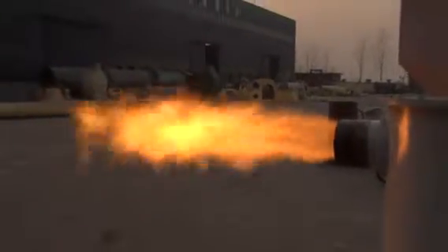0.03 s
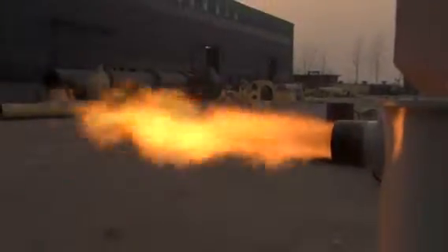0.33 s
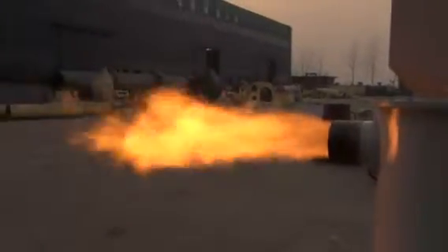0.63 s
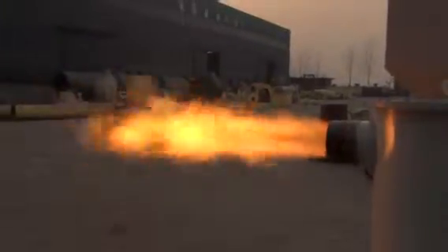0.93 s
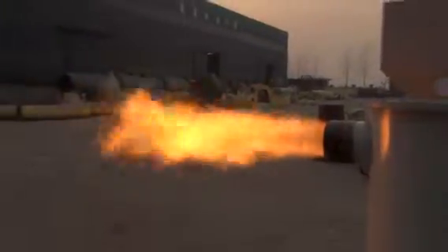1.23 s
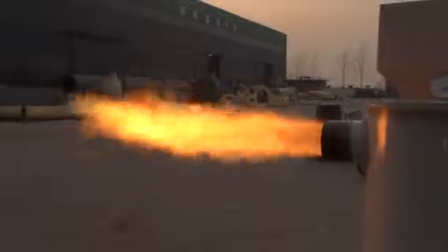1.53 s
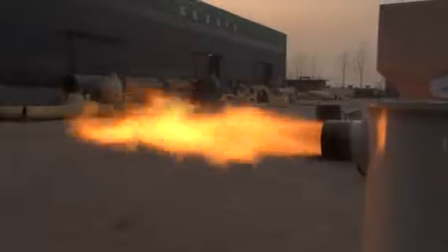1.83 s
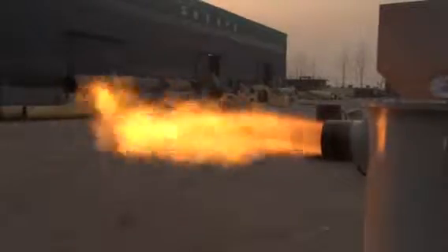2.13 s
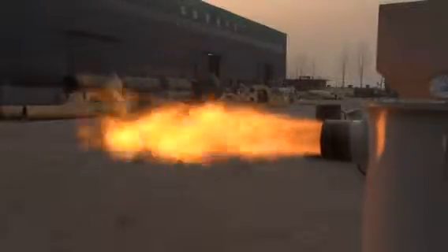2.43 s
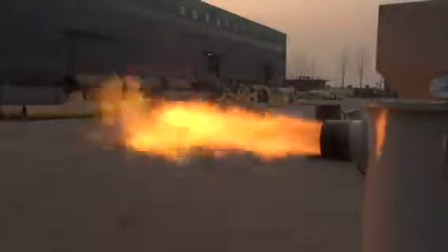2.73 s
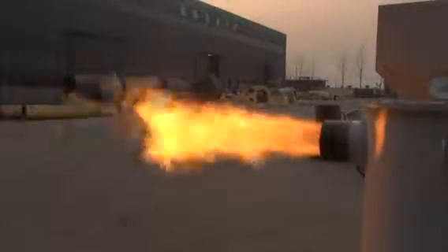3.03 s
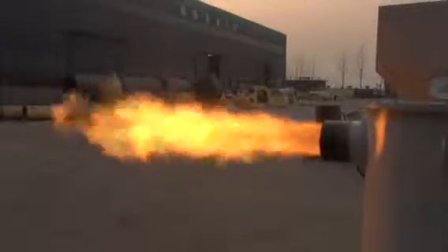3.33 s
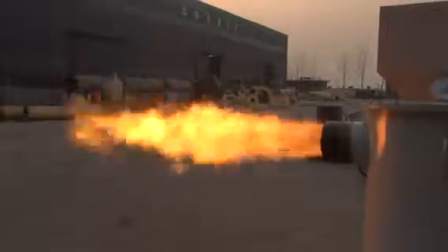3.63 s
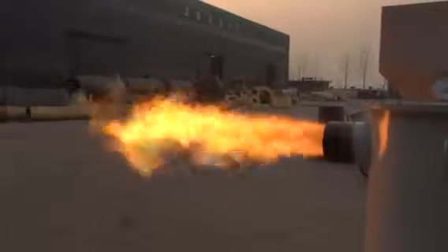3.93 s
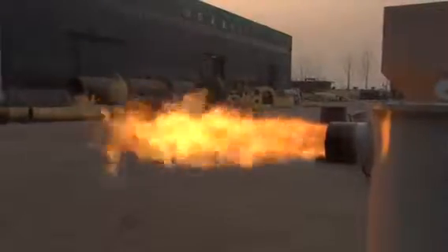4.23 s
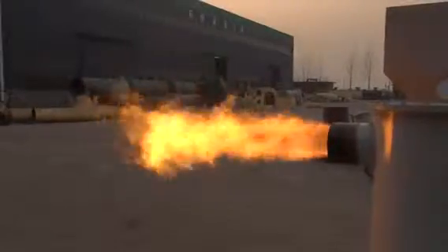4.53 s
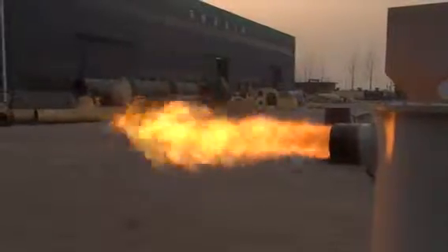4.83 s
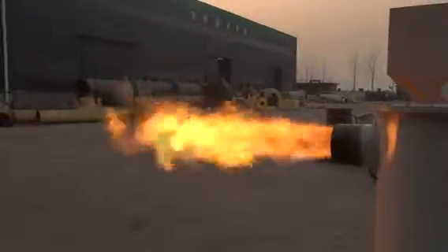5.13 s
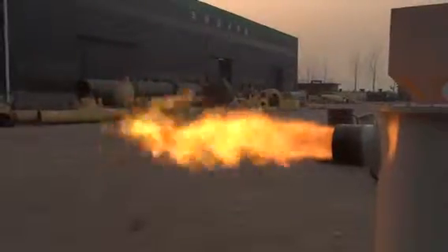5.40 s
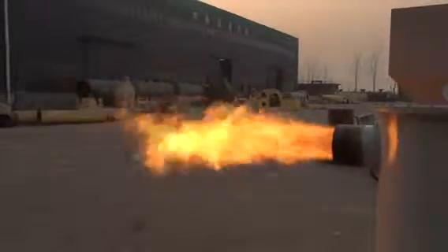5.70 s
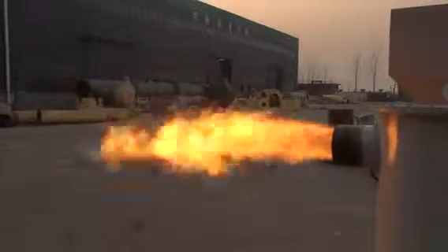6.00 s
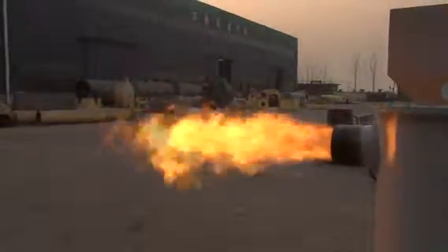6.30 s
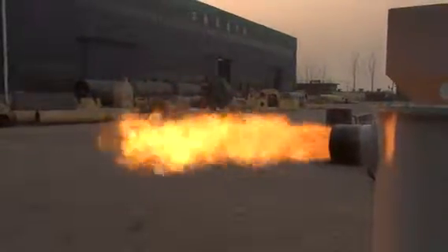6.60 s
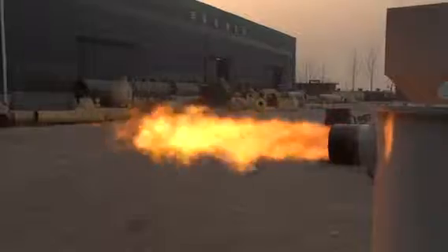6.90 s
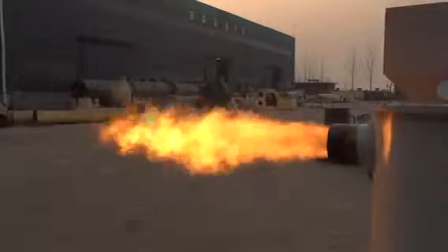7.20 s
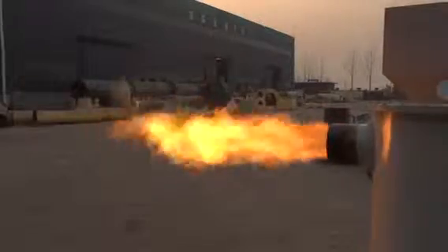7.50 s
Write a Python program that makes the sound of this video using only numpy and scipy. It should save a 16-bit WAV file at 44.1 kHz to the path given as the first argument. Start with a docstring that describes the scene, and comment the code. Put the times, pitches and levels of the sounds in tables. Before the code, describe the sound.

Steady low roar of a flame jet blasting from a burner tube in an open yard, with fluttering hiss and a very faint blower whine.

```python
"""Industrial burner in an open yard

A long horizontal flame burns a few metres away. Turbulent combustion excites the resonances of the
burner tube and its housing, which roar with a low rumble, a throbbing drone and a hollow howl.
The jet hisses in gusts above them, the blower adds a faint whine and a fast limiter shaves the peaks."""
import sys
import numpy as np
from scipy import signal
from scipy.fft import rfft, irfft
from scipy.io import wavfile
from scipy.ndimage import uniform_filter1d

SR = 44100
rng = np.random.default_rng(int(sys.argv[2]) if len(sys.argv) > 2 else 0)


def output_pcm(signal):
    """Save a mono or channel-first signal as 16-bit PCM at the path in sys.argv[1].

    Samples are clipped to [-1, 1] before scaling.
    """
    pcm = np.clip(np.atleast_2d(signal).T, -1, 1) * 32767
    wavfile.write(sys.argv[1], SR, np.round(pcm).astype(np.int16))


N = 341775
TIME = np.arange(N) / SR
FRAME, HOP = 512, 128  # samples

# Spectrum of the jet's hiss: frequency_hz, relative_level_db
JET_SPECTRUM = [(500, -34), (920, -4), (1250, 0), (1430, -1), (1600, -0.5), (2170, 0.25), (2280, -4.5),
                (2750, -6), (3300, -10), (4400, -15), (7500, -20.5), (9800, -24.1), (11900, -31.5),
                (13000, -41)]
# Coherence of the hiss between left and right: frequency_hz, coherence (0 to 1)
JET_COHERENCE = [(100, 1.0), (3500, 0.99), (5000, 0.94), (8000, 0.78), (12000, 0.67)]
# Gusts of the jet's lower rasp and high hiss: time_s, rasp_gain_db, hiss_gain_db
JET_GUSTS = [(0.0, 0, 0.0), (0.28, 0.1, -0.2), (0.33, -2.0, -3), (0.45, 0.2, 0), (0.7, -1.1, -1.0),
             (0.8, -0.5, 0.5), (0.97, -0.8, -0.5), (1.12, 0.7, 0.5), (1.57, -1.1, -1.0), (1.98, 2.6, 2),
             (2.12, -1.1, -1), (2.25, 0.9, 2.2), (2.35, -0.8, 0), (2.42, 1.6, 1.4), (2.8, -0.4, 0.2),
             (2.88, 1.3, 2.2), (3.02, -0.2, 0.3), (3.12, 0.4, 1.1), (3.2, 1, 0), (3.27, -1, 0.5),
             (3.35, 2.5, 1.3), (3.42, -1.1, -0.5), (3.48, 1.6, 2.5), (3.6, -0.6, 0), (4.03, 0.5, 0.5),
             (4.08, 0.7, 1), (4.28, 0.5, -0.8), (4.38, 0.2, -0.6), (4.42, -2.2, -1.6), (4.6, 0.5, 0.3),
             (4.95, 0.0, -0.8), (5.22, 0.3, 0), (5.55, -0.5, -0.8), (5.62, 1.5, 1), (5.83, -1.7, -0.8),
             (6.08, -0.3, -0.4), (6.15, -1.7, -1.7), (6.45, 0.8, 0.5), (6.88, -1.5, -0.2), (7.22, 0.6, 0.2),
             (7.33, -1.8, -1), (7.45, 0, -1.3), (7.53, -1.8, -1.8), (7.75, -1, 0.3)]
# Narrow resonances of the nozzle: centre_hz, width_hz, boost_db
NOZZLE_MODES = [(1590, 62, 1), (2180, 36, 2.5), (3660, 80, 1.5)]
# Resonances of the burner tube and housing: centre_hz, width_hz, relative_level_db
BURNER_MODES = [(77, 32.3, -8.5), (125.3, 21.5, -11.5), (154.5, 10, -9), (187.3, 30, -1.5), (213, 28, -9),
                (241, 24, -1.5), (256.7, 23, -0.5), (276, 19, -8), (296, 17, -7), (314.5, 39.5, -4),
                (355.4, 27, -8), (444, 40.5, -8.5), (485, 47, -7.5), (533.4, 53.5, -2.05), (579, 49, -5),
                (653, 87, -11.5), (729, 56, -10.5), (782, 58, -10.5), (845.5, 67, -14), (1054, 100, -19)]
# Continuous spectrum between those resonances: frequency_hz, relative_level_db
ROAR_CONTINUUM = [(10, -42), (22, -40), (50, -21), (130, -18), (390, -18.5), (850, -26), (1000, -33),
                  (2000, -72)]
# Rumble of the billowing flame: time_s, gain_db
RUMBLE_SWELL = [(0.0, -3.5), (0.12, 0.5), (0.9, 1), (0.97, -4), (1.5, 1.5), (1.6, -5.5), (1.73, 3.5),
                (2.12, -3.5), (2.33, 0.2), (2.62, 3.7), (2.7, -2.9), (3.35, 2), (3.45, -3.5), (3.62, 1.9),
                (3.75, -5), (3.88, 1.5), (4.8, -3), (4.92, 2.5), (5.15, -5.5), (5.28, 1), (6.55, -0.3),
                (6.65, -3.1), (7.03, -1.5), (7.1, -3), (7.75, 2.5)]
# Throb of the deep drone: time_s, gain_db
DRONE_THROB = [(0.0, -1.3), (0.07, 2.6), (0.55, -4), (0.62, 2), (0.82, -1.5), (1.0, 2.6), (1.35, -3),
               (1.43, 0.8), (1.5, -2.7), (1.9, 2.3), (2.08, -3.3), (2.15, 0), (2.77, 1.6), (2.85, -2.9),
               (2.98, 1.2), (3.17, 1), (3.25, -8), (3.35, 1), (3.95, -2), (4.03, 0.5), (4.17, -3),
               (4.28, 4), (4.33, -0.8), (4.8, 1.0), (4.85, -3.5), (5.0, 0.7), (5.08, -5.6), (5.15, 1),
               (5.38, -3.4), (5.58, 2.5), (5.65, -4), (5.7, -0.3), (5.95, -2.5), (6.17, 3.6), (6.28, -5),
               (6.38, 3.5), (6.45, -4), (6.5, 0.0), (7.17, -0.7), (7.5, 3.0), (7.65, -4), (7.75, 0.6)]
# Swell of the howl, about an octave above the drone: time_s, gain_db
HOWL_SWELL = [(0.0, -1.5), (0.75, -0.8), (0.82, 3), (0.97, -4), (1.05, 1), (1.52, -0.3), (1.6, -3),
              (1.77, 0.8), (1.85, -2.5), (2.0, 1.6), (2.58, 0), (2.67, 1), (3.12, -0.6), (3.27, 1.7),
              (3.48, -2.5), (3.75, 2), (3.92, -2.5), (4.0, 2.5), (4.08, -3.5), (4.15, 1.7), (4.65, -0.1),
              (4.72, -4), (4.83, 1), (4.97, -3), (5.05, -1.5), (5.22, -5), (5.3, -1), (5.4, -3.5),
              (5.53, 0.3), (5.78, -3.5), (5.92, 0.5), (6.03, -3), (6.17, 0), (6.5, -2.5), (6.6, 1.5),
              (7.03, -0.5), (7.2, 2.0), (7.38, -5), (7.65, 1), (7.75, -0.5)]
# Slow swell of the rest of the roar: time_s, deep_gain_db, upper_gain_db
ROAR_SWELL = [(0.0, 0.1, -0.1), (0.7, -1.1, -0.5), (0.82, -1.3, 1.8), (1.02, 2.1, -0.2), (1.38, -0.3, 0.3),
              (1.5, 1.2, -1), (1.88, -1, 0.8), (2.33, 0.7, 0.1), (2.55, -1.5, 2), (3.02, 1.0, -0.1),
              (3.73, -0.8, 0.3), (3.83, 2, 1), (4.22, -0.5, -2.2), (4.35, 0.3, 0.2), (4.72, -0.8, 0),
              (4.95, -0.4, 2), (5.4, 0, -1), (6.12, -1.9, -0.5), (6.22, 0, -1.2), (6.33, 0.2, 0.6),
              (7.55, -0.4, -1.1), (7.75, 1, 1)]
# Level difference between the channels: frequency_hz, left_minus_right_db
STEREO_BALANCE = [(30, -4.8), (80, -3.5), (110, -3.0), (250, -3.0), (330, -3.5), (430, -3.5), (570, -3.0),
                  (760, -3.5), (1010, -2.5), (1340, -1.5), (1780, -2.5), (2360, -3.5), (3130, -3.0),
                  (4150, -2.0), (5500, -1.5), (7290, -2.0), (9670, -1.5), (12800, 0.5)]


def gain_of(db):
    """Amplitude grows tenfold for every 20 decibels."""
    return 10 ** (np.asarray(db) / 20)


def unit_rms(x):
    """Normalisation to a mean power of 1."""
    return x / np.sqrt(np.mean(x ** 2) + 1e-20)


def at_frequency(table, hz):
    """Interpolation of a spectrum on a logarithmic frequency axis."""
    table_hz, values = np.transpose(table)
    return np.interp(np.log(hz + 1), np.log(table_hz + 1), values)


def at_time(table, t, column=1):
    """Linear interpolation of an envelope in time."""
    table = np.asarray(table)
    return np.interp(t, table[:, 0], table[:, column])


def wander(t, slow_hz, fast_hz):
    """Superposed sinusoids of random phase give a smooth fluctuation of rms 1."""
    rates = np.geomspace(slow_hz, fast_hz, num=40)
    return unit_rms(sum(np.sin(2 * np.pi * (f * t + rng.random())) / np.sqrt(f) for f in rates))


def blower_whine(blade_hz=4636, drift_hz=1.7, mean_db=-64, waver_db=3.0):
    """Periodic blade passage makes a thin tone, which wavers in the hot air."""
    t = TIME[::HOP]
    pitch_hz = np.interp(TIME, t, blade_hz + drift_hz * wander(t, 0.4, 15))
    level_db = np.interp(TIME, t, mean_db + waver_db * wander(t, 0.75, 12))
    return gain_of(level_db) * np.sqrt(2) * np.sin(2 * np.pi * np.cumsum(pitch_hz) / SR)


def nozzle_resonance(hiss):
    """Resonance lifts the hiss near the natural frequencies of the nozzle."""
    hz = np.fft.rfftfreq(N, 1 / SR)
    boost_db = sum(db * np.exp(-((hz - centre_hz) / width_hz) ** 2)
                   for centre_hz, width_hz, db in NOZZLE_MODES)
    return irfft(rfft(hiss) * gain_of(boost_db), N)


def jet_hiss(level_db=-30.5, flutter_db=0.48, eddy_db=0.55):
    """Turbulence radiates broadband noise; eddies make it flutter and briefly brighten patches of it."""
    hz = np.fft.rfftfreq(FRAME, 1 / SR)
    t = np.arange(N // HOP + 6) * HOP / SR
    real, imag, other_real, other_imag, eddies = rng.standard_normal((len(t), len(hz), 5)).T
    eddies = uniform_filter1d(eddies, size=24, axis=0)  # extent in frequency
    eddies = unit_rms(uniform_filter1d(eddies, size=14, axis=1))  # extent in time
    # The shortest waves reach the two channels less alike.
    coherence = at_frequency(JET_COHERENCE, hz)[:, None]
    left = real + 1j * imag
    right = coherence * left + np.sqrt(1 - coherence ** 2) * (other_real + 1j * other_imag)
    high_share = at_frequency([(2200, 0), (3200, 1)], hz)[:, None]  # from rasp to high hiss
    gust_db = (1 - high_share) * at_time(JET_GUSTS, t) + high_share * at_time(JET_GUSTS, t, column=2)
    shape_db = at_frequency(JET_SPECTRUM, hz)[:, None] + gust_db
    turbulence_db = eddy_db * eddies + flutter_db * wander(t, 12, 40)
    spectra = np.array([left, right]) * gain_of(shape_db + turbulence_db)
    _, hiss = signal.istft(spectra, nperseg=FRAME, noverlap=FRAME - HOP)
    return gain_of(level_db) * unit_rms(nozzle_resonance(hiss[:, :N]))


def surging_band(spectrum, swell_db, steady_s, surge_db):
    """Amplitude modulation: a steadied noise band follows its swell, and turbulence adds random surges."""
    band = irfft(spectrum, N)
    noise = unit_rms(band)
    window = int(steady_s * SR)
    local_power = uniform_filter1d(uniform_filter1d(noise ** 2, window), window)
    steady = noise / np.sqrt(local_power + 1e-12)
    t = TIME[::HOP]
    surges = np.interp(TIME, t, wander(t, slow_hz=2.2, fast_hz=6.0))
    return band.std() * steady * gain_of(swell_db + surge_db * surges)


def combustion_roar(level_db=-18, split_hz=392):
    """Random heat release drives the burner's resonances; five bands of the roar swell separately."""
    hz = np.fft.rfftfreq(N, 1 / SR)
    power = gain_of(at_frequency(ROAR_CONTINUUM, hz)) ** 2
    for centre_hz, width_hz, db in BURNER_MODES:
        power += gain_of(db) ** 2 / (1 + ((hz - centre_hz) / width_hz) ** 2) ** 4
    pressure = rfft(rng.standard_normal(N)) * np.sqrt(power)
    in_rumble = hz < 105
    in_drone = (hz > 215) & (hz < 290)
    in_howl = (hz > 480) & (hz < 610)
    rumble = surging_band(pressure * in_rumble, at_time(RUMBLE_SWELL, TIME), steady_s=0.17, surge_db=0.26)
    drone = surging_band(pressure * in_drone, at_time(DRONE_THROB, TIME), steady_s=0.099, surge_db=0.5)
    howl = surging_band(pressure * in_howl, at_time(HOWL_SWELL, TIME), steady_s=0.07, surge_db=0.2)
    # The rest divides at the trough between the deep and the upper resonances.
    rest = pressure * ~(in_rumble | in_drone | in_howl)
    deep_db, upper_db = at_time(ROAR_SWELL, TIME), at_time(ROAR_SWELL, TIME, column=2)
    deep = surging_band(rest * (hz < split_hz), deep_db, steady_s=0.15, surge_db=0.6)
    upper = surging_band(rest * (hz >= split_hz), upper_db, steady_s=0.14, surge_db=0.57)
    return gain_of(level_db) * unit_rms(rumble + drone + howl + deep + upper)


def scene():
    """Roar, hiss and whine superpose; a level difference places them together a little to the right."""
    burner = combustion_roar() + jet_hiss() + blower_whine()
    balance_db = at_frequency(STEREO_BALANCE, np.fft.rfftfreq(N, 1 / SR))
    channel_gains = gain_of(np.array([balance_db, -balance_db]) / 2)
    return irfft(rfft(burner) * channel_gains / channel_gains.mean(0), N)


def limiter(x, ceiling_db, release_db_per_s):
    """Peak limiting: the gain falls quickly on a peak and recovers within milliseconds."""
    peak_db = 20 * np.log10(abs(x).max(0) + 1e-9)
    excess_db = np.maximum(peak_db - ceiling_db, 0)
    recovery_db = TIME * release_db_per_s
    reduction_db = np.maximum.accumulate(excess_db + recovery_db) - recovery_db
    return x * gain_of(-uniform_filter1d(reduction_db, size=40))


def record(dry):
    """Limiting shaves the peaks, then low-pass filtering removes the highest treble."""
    limited = limiter(dry, ceiling_db=-9.6, release_db_per_s=260)
    low_pass = signal.firwin(511, cutoff=13200, window=("kaiser", 9), fs=SR)
    return signal.oaconvolve(limited, low_pass[None], "same")


dry = scene()
out = record(dry)
output_pcm(out)
```